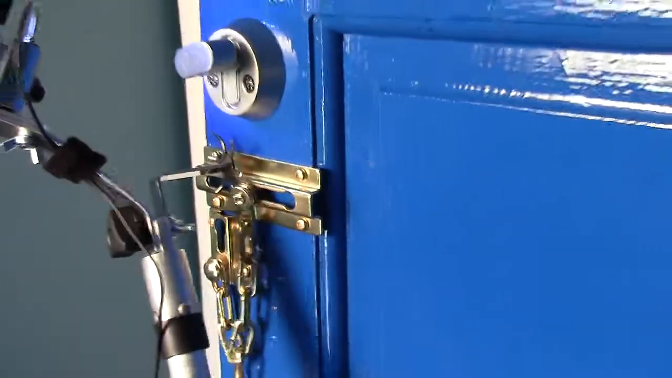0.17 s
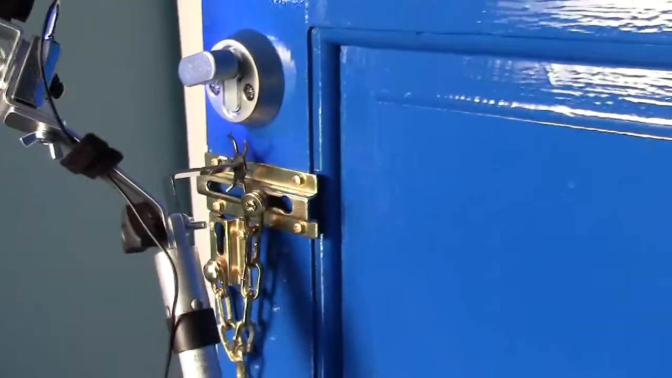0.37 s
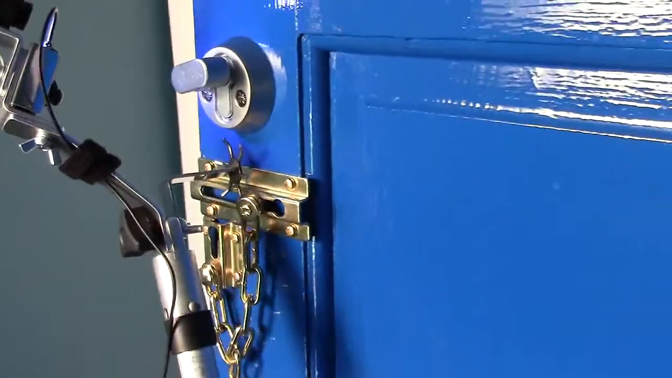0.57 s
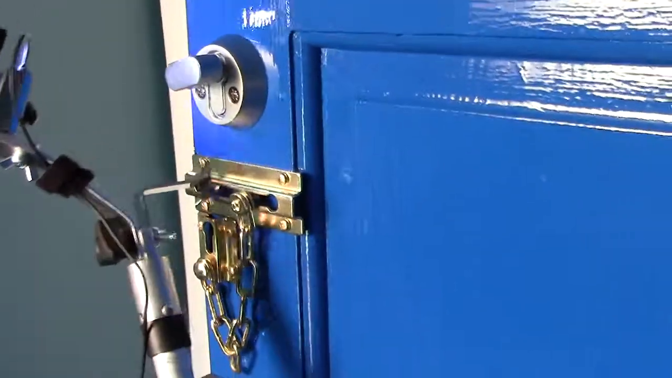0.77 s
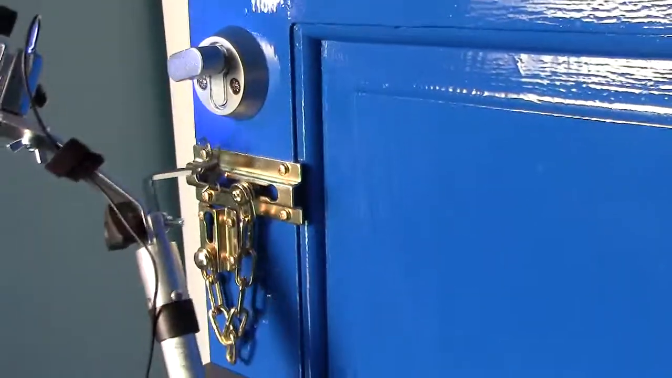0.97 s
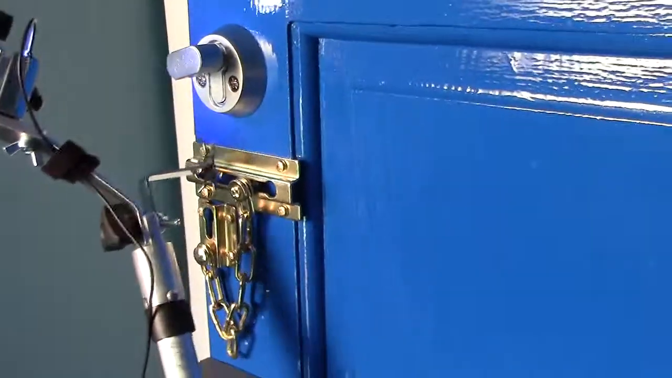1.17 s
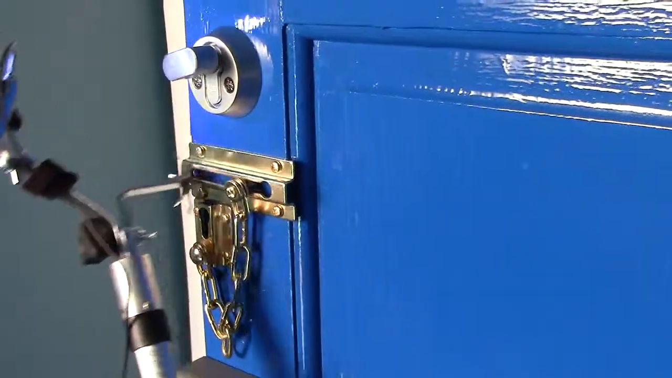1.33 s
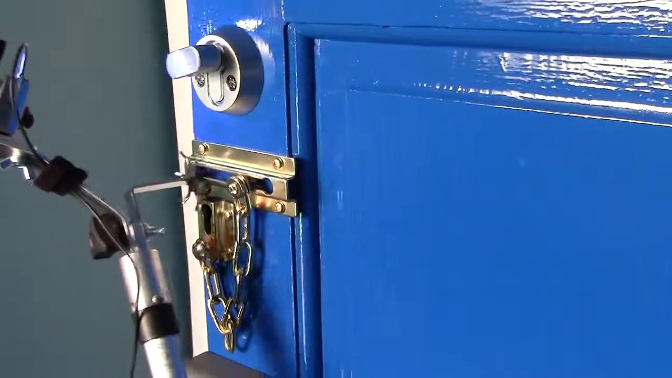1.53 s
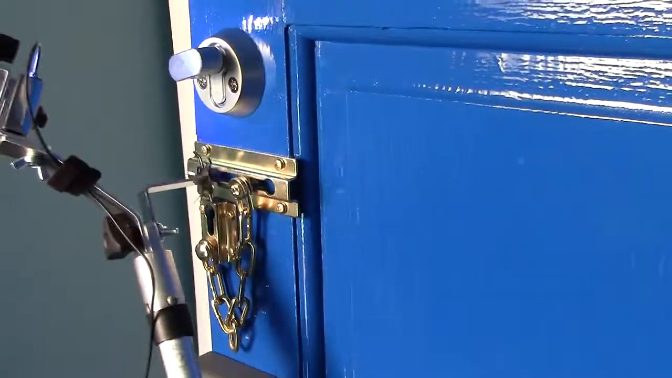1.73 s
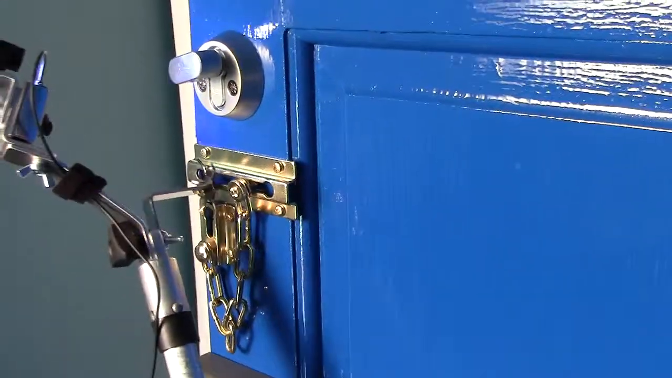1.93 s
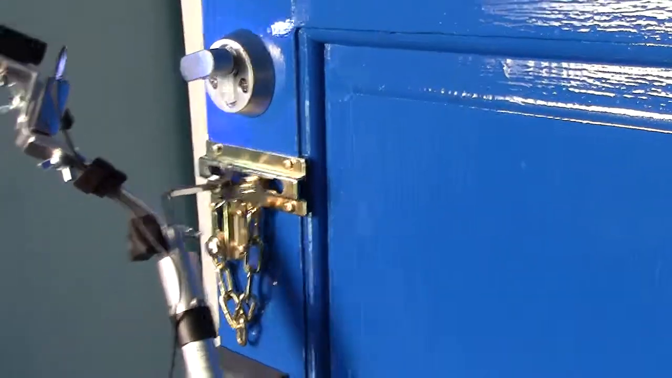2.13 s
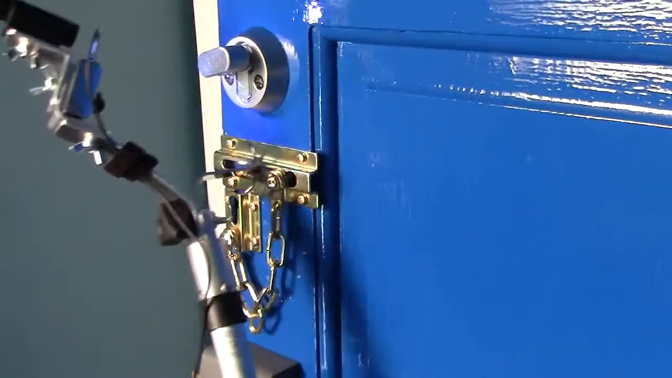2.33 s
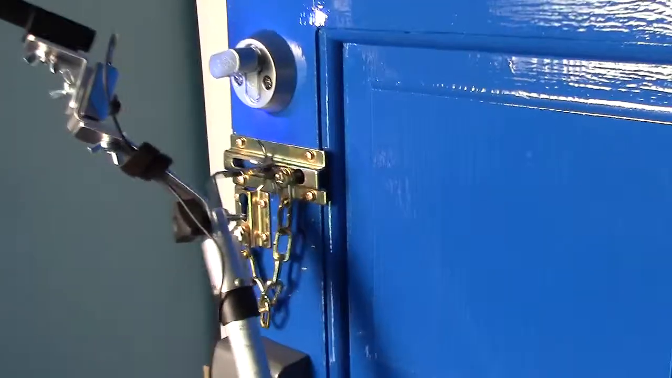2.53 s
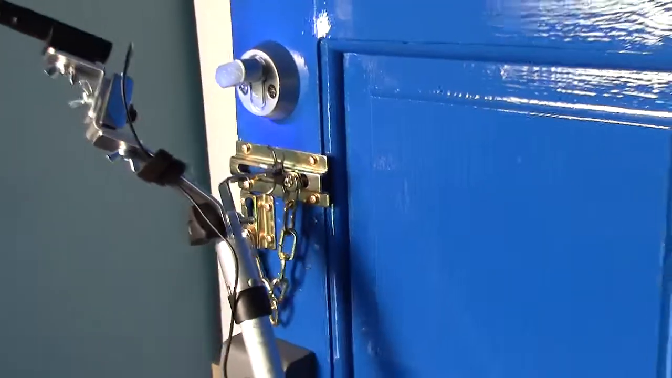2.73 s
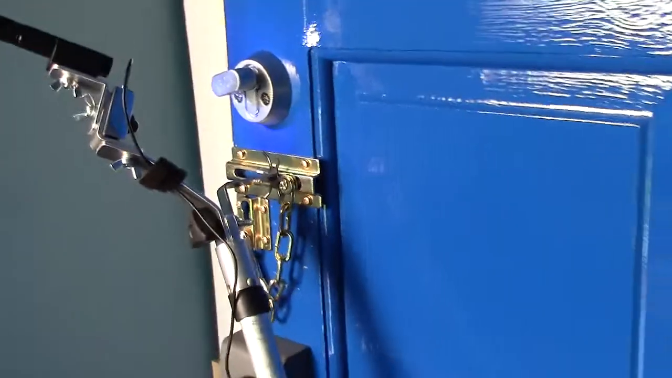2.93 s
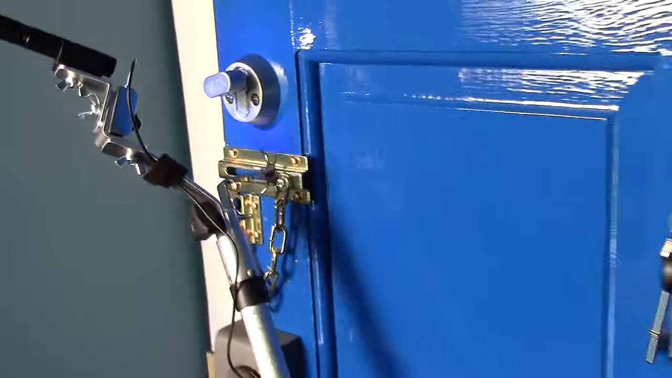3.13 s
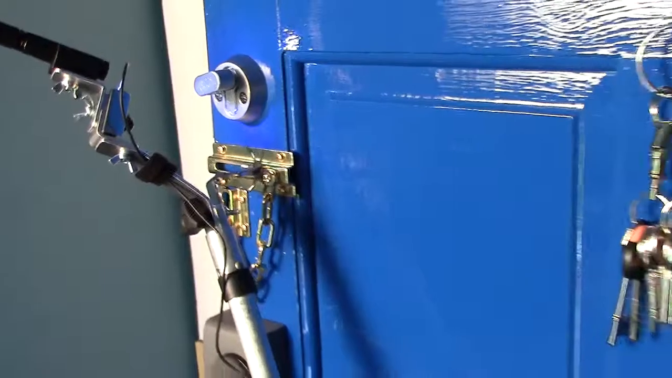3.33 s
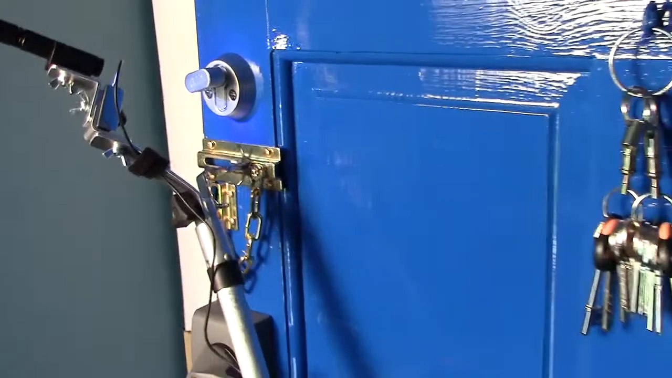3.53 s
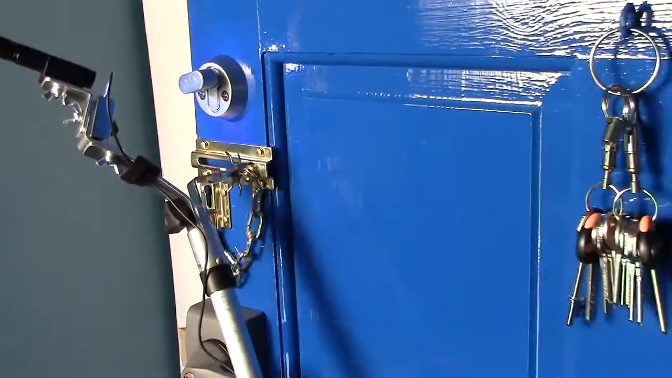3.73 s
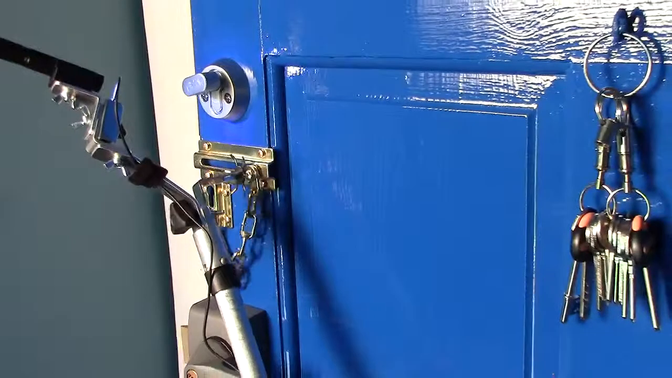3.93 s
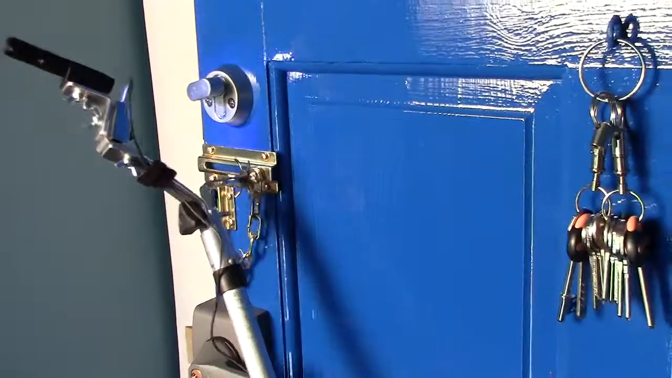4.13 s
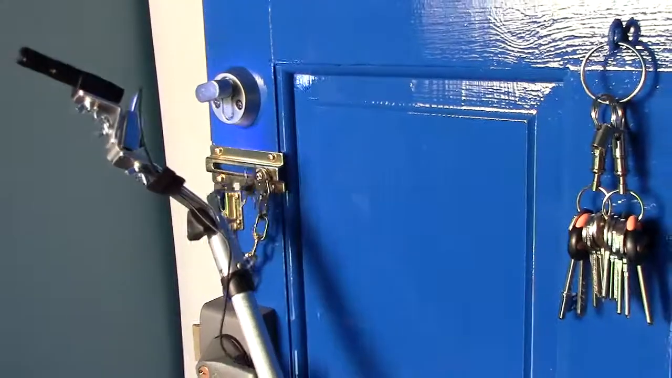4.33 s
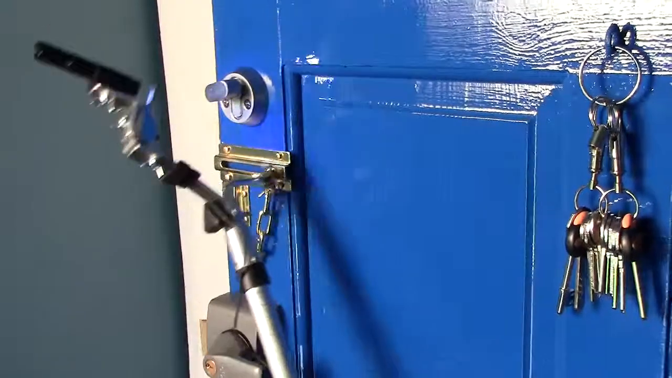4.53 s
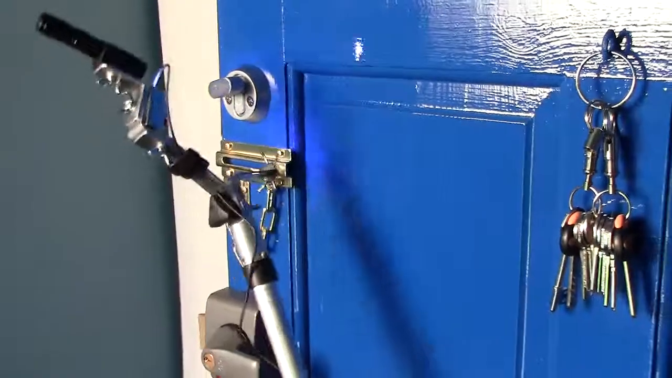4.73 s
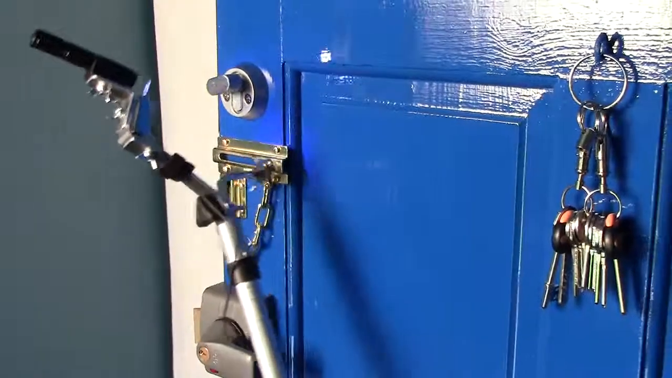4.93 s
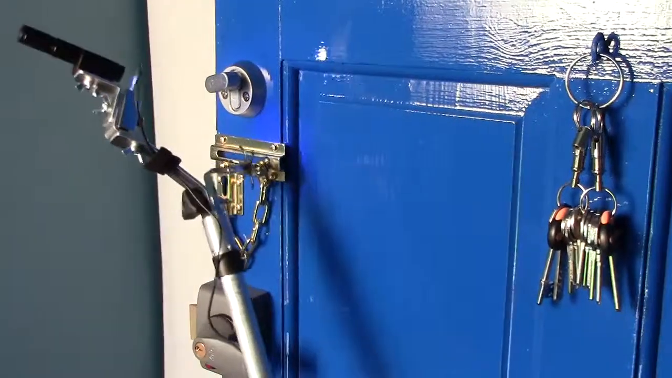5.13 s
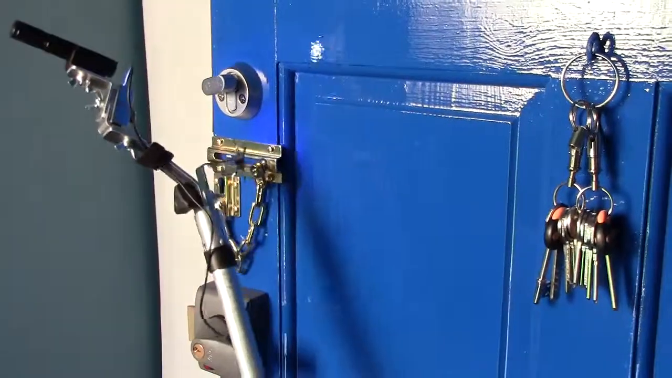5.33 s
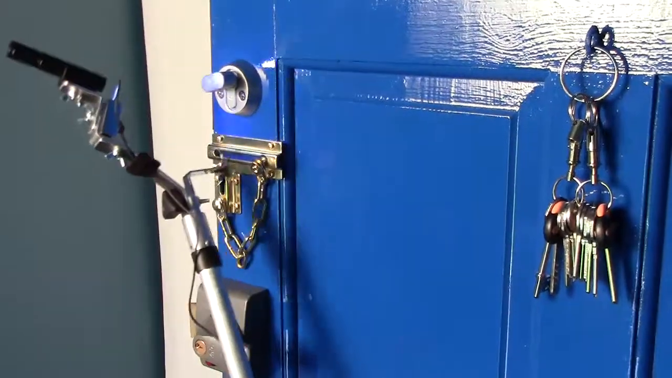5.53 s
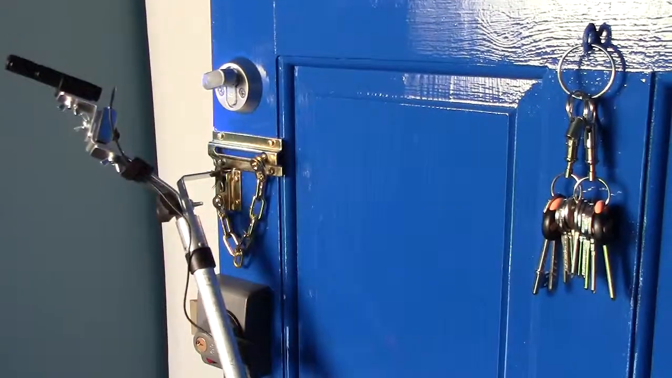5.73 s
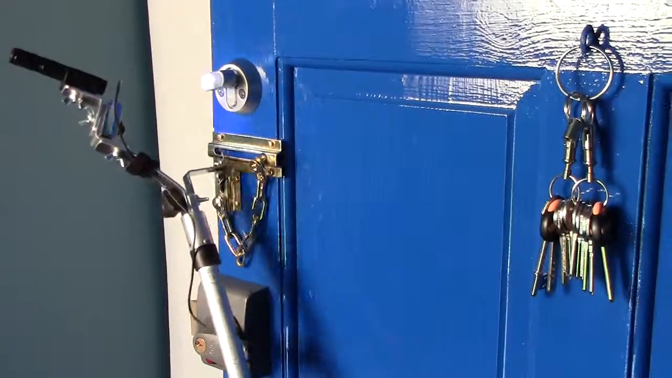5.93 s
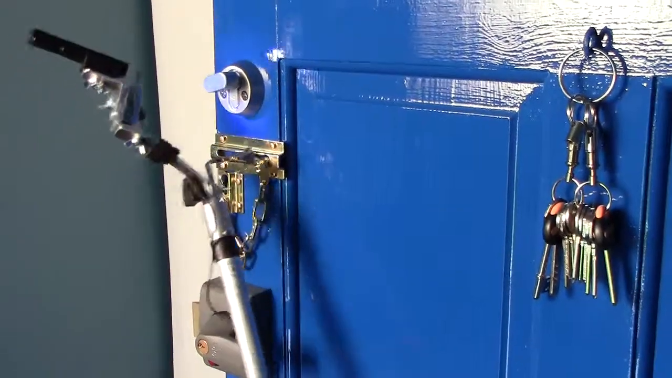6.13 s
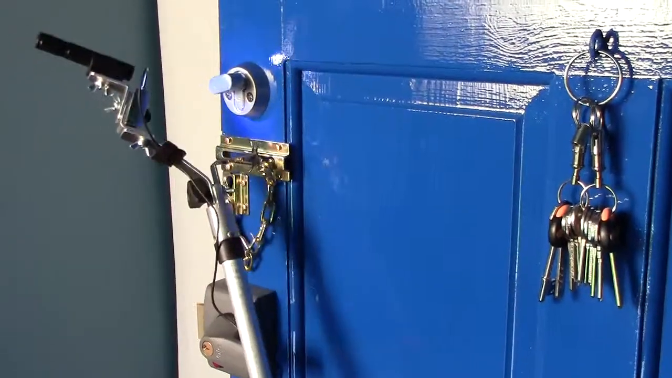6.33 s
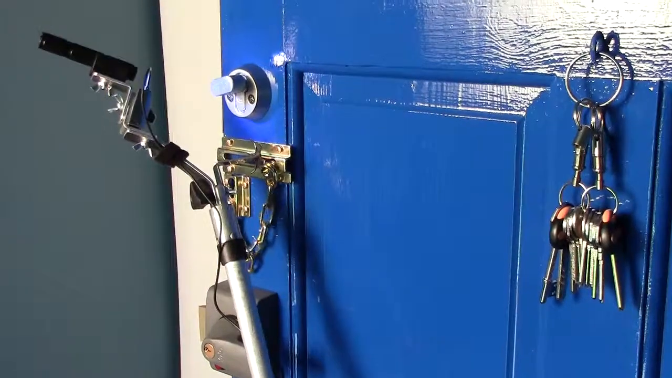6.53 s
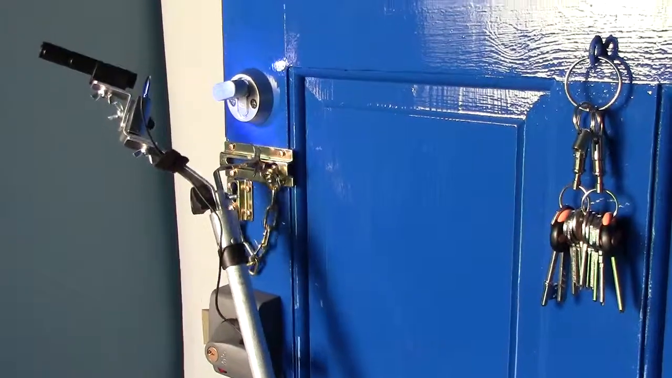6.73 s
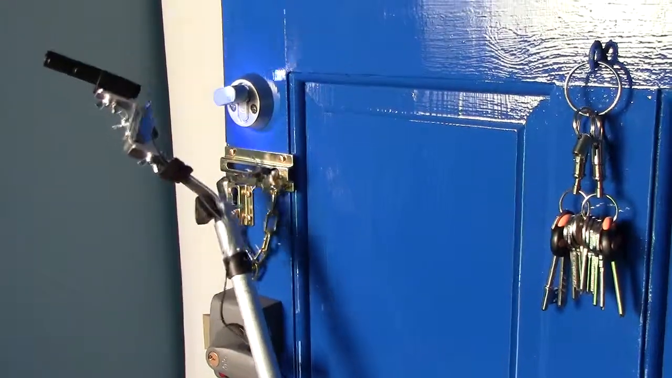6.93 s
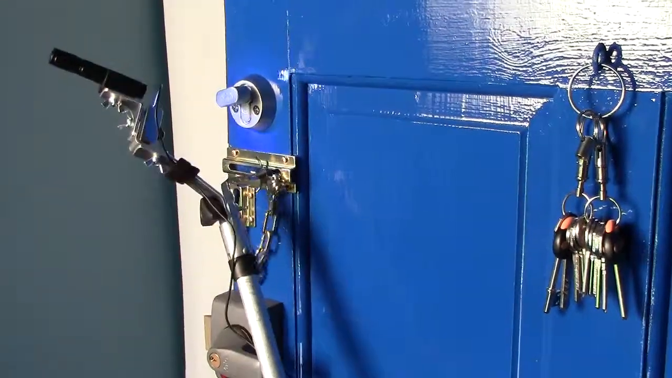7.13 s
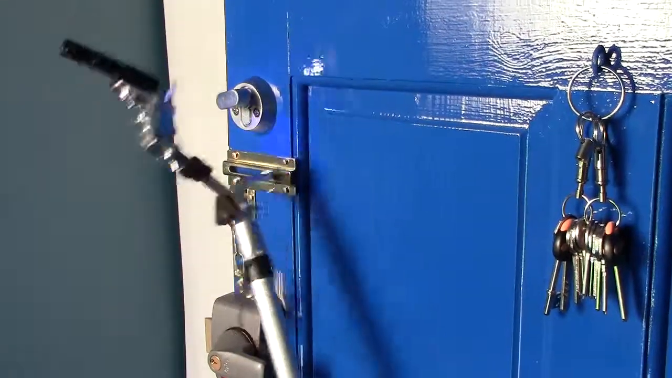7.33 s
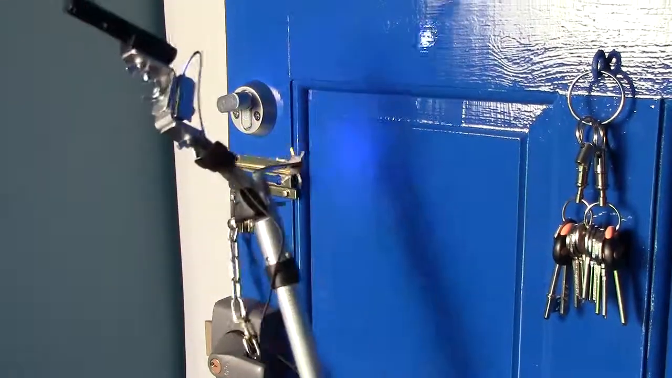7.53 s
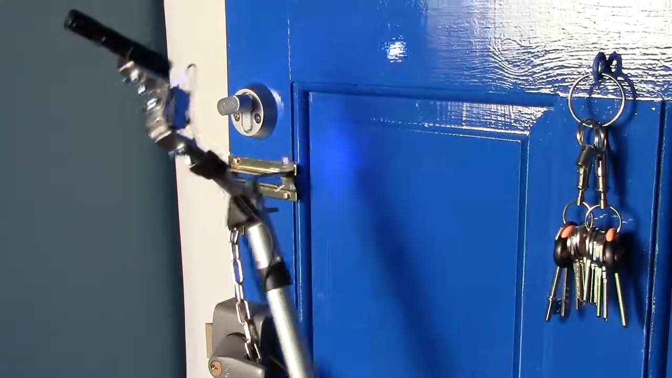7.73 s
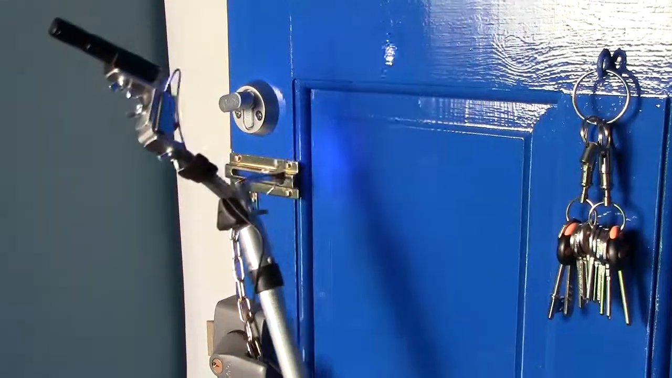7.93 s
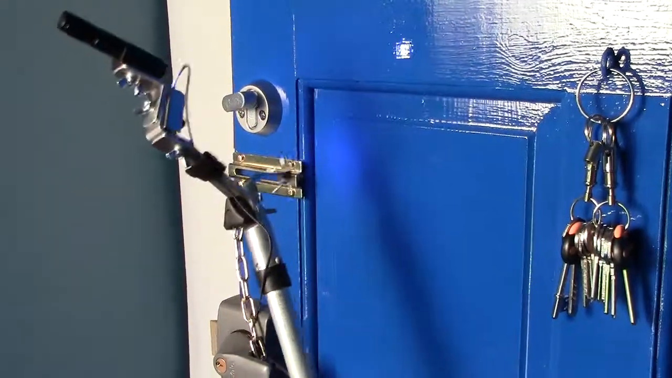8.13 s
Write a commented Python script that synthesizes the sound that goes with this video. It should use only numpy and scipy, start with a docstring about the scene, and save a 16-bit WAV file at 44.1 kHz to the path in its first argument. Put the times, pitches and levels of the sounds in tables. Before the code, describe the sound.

A metal rod taps and scrapes at a door chain, with dull door thuds and faint squeaks, until the chain falls clattering and jingling.

```python
"""In a small hallway, a hooked metal rod works a brass door chain out of its slide.
Knocks (sharp blows with chatter) and rough rattles (showers of clicks: scrapes and clatter after knocks)
shake a door, plate, rod and links, each a set of resonances. Decaying tones make the door boom and
single links ring; at last the chain drops and jingles. Thin gliding squeaks, noise, a hum and a low
drone hang over the quiet room, and decaying noise gives the hallway's reflections."""
import sys
import numpy as np
from scipy import signal
from scipy.io import wavfile

SR = 44100
rng = np.random.default_rng(int(sys.argv[2]) if len(sys.argv) > 2 else 0)


def master_out(mix):
    """Clip the mix to full scale and print it as 16-bit PCM to the path in sys.argv[1]."""
    frames = np.transpose(np.atleast_2d(mix))
    ceiling = np.clip(frames, -1, 1)
    pcm = np.round(ceiling * 32767).astype(np.int16)
    wavfile.write(sys.argv[1], SR, pcm)


N = 360738   # length in samples


def amp(db):
    """Turn decibels into gain."""
    return 10 ** (np.asarray(db) / 20)


def rms_one(x):
    """Scale a signal to rms 1."""
    return x / np.sqrt(np.mean(x ** 2) + 1e-20)


def at_hz(points, hz):
    """Read a table between its rows on a log-frequency axis."""
    table = np.array(points)
    return np.interp(np.log(hz), np.log(table[:, 0]), table[:, 1])


def span(rows):
    """Give a curve's sample positions, its columns at those positions and a gate that fades both ends."""
    s, *columns = np.transpose(rows)
    at = np.arange(int(s[0] * SR), min(int(s[-1] * SR), N))
    from_end = np.minimum(at - at[0], at[-1] - at)
    gate = np.clip(from_end / (0.0041 * SR), 0, 1)   # fades of 4.1 ms
    return at, [np.interp(at / SR, s, c) for c in columns], gate


def drift(rate_hz):
    """Smooth random movement with rms 1: noise through a two-pole low-pass at the given rate."""
    step = 40   # computed at every 40th sample, with straight lines between
    r = np.exp(-2 * np.pi * rate_hz * step / SR)
    noise = rng.standard_normal(N // step + 2002)
    slow = signal.lfilter([1], [1, -2 * r, r * r], noise)[2000:]
    return np.interp(np.arange(N) / step, np.arange(len(slow)), rms_one(slow))


def bands():
    """Half-octave band filters, each with its centre in Hz."""
    edges = 22 * 2 ** np.arange(0, 9.6, .5)
    return [(np.sqrt(low * high), signal.butter(2, [low, high], "band", fs=SR, output="sos"))
            for low, high in zip(edges, edges[1:])]


def add(out, s, sound):
    """Mix a short sound in at a time in seconds."""
    i = int(s * SR)
    out[i:i + len(sound)] += sound[:N - i]


# Colour of the steady noise. Each row: pitch in Hz, relative level in dB per Hz.
AIR_COLOUR = [(25, 1), (50, 2.5), (62, 5), (85, 4.5), (160, -2), (250, 0), (400, -3.5), (630, -6),
              (1000, -10), (2000, -15), (4000, -18), (8000, -23), (13000, -34), (16000, -12)]
# How alike the noise is on both sides. Each row: pitch in Hz, left-right likeness (1 is identical).
AIR_LIKENESS = [(60, 1), (180, 0.21), (550, 0.28), (1650, 0.61), (4970, 0.79), (15000, 0.7)]
# Tones of the hum. Each row: pitch in Hz, average level in dB rms.
HUM_TONES = [(150, -62), (230, -67), (460, -72), (690, -67.5), (916, -79)]
# The gliding low drone. Each row: time in seconds, pitch in Hz, peak level in dB.
DRONE_CURVE = [(0.0, 41.6, -49), (0.45, 41.1, -67), (1.07, 41.5, -46.5), (1.64, 41.0, -57),
               (4.19, 39.4, -48), (5.26, 40.7, -57), (6.17, 43.3, -65), (6.42, 46.3, -71),
               (6.54, 42.2, -60), (8.18, 36.9, -56.5)]
AIR_DB = -49.5   # rms of the noise


def room_air():
    """Steady stereo noise shaped band by band, plus a slightly wavering hum and a low drone."""
    noise, white = 0, rng.standard_normal((2, 2, N))
    for k, (hz, sos) in enumerate(bands()):
        mid, side = signal.sosfilt(sos, white[k % 2])
        alike = np.clip(at_hz(AIR_LIKENESS, hz), -1, 1)
        gain = amp(at_hz(AIR_COLOUR, hz) + 0.23 * drift(3))
        stereo = np.sqrt(1 + alike) * mid + np.sqrt(1 - alike) * side * [[1], [-1]]
        noise = noise + gain * stereo
    t = np.arange(N) / SR
    tones = np.zeros(N)
    for hz, db in HUM_TONES:
        level = amp(db + 3 + 2.0 * drift(7.9))   # 3 dB turns a sine's rms into its peak
        tones += level * np.sin(2 * np.pi * hz * t + 0.58 * drift(1.9))
    at, (hz, level_db), _ = span(DRONE_CURVE)
    tones[at] += amp(level_db) * np.sin(2 * np.pi * np.cumsum(hz) / SR)
    return amp(AIR_DB) * rms_one(noise) + tones


# How long reflections last. Each row: pitch in Hz, seconds to fall by 60 dB.
HALL_T60 = [(100, 0.45), (300, 0.43), (1000, 0.34), (4000, 0.23), (13000, 0.12)]
# How little the two sides differ. Each row: pitch in Hz, level of the difference against the middle in dB.
HALL_SIDE = [(100, -19), (1000, -26.5), (4000, -16), (13000, -13.5)]
HALL_DB = -0.5


def hallway(x):
    """Reflections as noise that dies band by band; left and right share most of the tail."""
    t = np.arange(int(.7 * SR)) / SR
    white = rng.standard_normal((2, 2, len(t)))
    tail = 0
    for k, (hz, sos) in enumerate(bands()):
        fall_db = -60 * t / at_hz(HALL_T60, hz)
        mid_side_db = [[0], [at_hz(HALL_SIDE, hz)]]
        tail = tail + signal.sosfilt(sos, white[k % 2]) * amp(fall_db + mid_side_db)
    tail = tail * np.clip(t / 0.0014, 0, 1)   # fades in over 1.4 ms
    tail = tail / np.sqrt(np.sum(tail[0] ** 2))
    mid, side = signal.fftconvolve(x[None], tail, axes=1)[:, :N]
    return amp(HALL_DB) * (mid + side * [[1], [-1]])


# Thin squeaks. Each row: start in seconds, length in seconds, first pitch in Hz, last pitch in Hz,
# level in dB rms before the swell and the mix, pitch blur in Hz.
SQUEAK_GLIDES = [(.42, .08, 7500, 6700, -72, 100), (.6, 0.11, 7700, 7100, -76, 91),
                 (0.812, 0.12, 5750, 5700, -71, 60), (1.09, 0.1, 4070, 4030, -64.5, 40),
                 (1.244, 0.12, 6000, 5950, -68, 200), (1.406, 0.12, 4050, 4070, -62, 40),
                 (2.33, 0.16, 4320, 4320, -68, 120), (2.55, 0.18, 4500, 4460, -63, 200),
                 (2.75, 0.17, 4800, 4720, -65, 100), (2.617, 0.107, 6050, 5860, -69, 150),
                 (3.325, .3, 6420, 6500, -62.5, 120), (3.6, .22, 6250, 6100, -73, 80),
                 (3.47, 0.45, 5500, 5300, -63, 148), (3.62, 0.28, 5070, 5130, -68, 150),
                 (8.0, 0.1, 3800, 3780, -70, 50)]
SQUEAK_SWELL = 0.26   # power of the sine-shaped swell; lower is flatter


def squeaks():
    """Thin gliding tones: the pitch wanders quickly and the level flutters."""
    out, wobble, flutter = np.zeros(N), drift(107), rms_one(1.6 + drift(60))
    for s, length_s, first_hz, last_hz, level_db, blur_hz in SQUEAK_GLIDES:
        at = np.arange(int(s * SR), min(int((s + length_s) * SR), N))
        along = np.linspace(0, 1, len(at))
        hz = first_hz + (last_hz - first_hz) * along + blur_hz * wobble[at]
        swell = np.sin(np.pi * along).clip(0) ** SQUEAK_SWELL
        tone = np.sqrt(2) * np.sin(2 * np.pi * np.cumsum(hz) / SR)
        out[at] += swell * amp(level_db) * flutter[at] * tone
    return out


WANDER_HZ = 45.7                     # loose contact blurs every ringing pitch by this width
PAIR_SPLIT, PAIR_DB = 0.0516, -3.5   # a weaker second tone sits this share higher, and the two beat


def rings(rows):
    """Decaying tone pairs (s, dB, Hz, t60 s, rise s); loose contact makes the pitch wander at random."""
    out, t = np.zeros(N), np.arange(SR // 2) / SR
    for s, db, hz, t60, rise_s in rows:
        wander = np.cumsum(rng.standard_normal(len(t))) * np.sqrt(WANDER_HZ * 2 * np.pi / SR)
        turn = 2 * np.pi * hz * t + wander
        second = np.sin(turn * (1 + PAIR_SPLIT) + rng.uniform(0, 2 * np.pi))
        pair = np.sin(turn) + amp(PAIR_DB) * second
        rise = 1 - np.exp(-t / rise_s)
        add(out, s, amp(db - 60 * t / t60) * rise * pair)
    return out


# Pushes and jolts that set the door panel ringing.
# Each row: start in seconds, level in dB before the rise and the mix, pitch in Hz.
DOOR_THUDS = [(0.151, -37.5, 283), (0.708, -32, 75), (0.719, -33, 249), (.792, -23.5, 455),
              (0.798, -35, 97), (1.598, -23.5, 426), (1.604, -26, 156.5), (1.603, -28, 233),
              (1.734, -25.5, 460), (1.738, -35, 91.6), (2.092, -33, 450), (2.453, -37.5, 406),
              (2.705, -36.5, 151), (3.089, -33, 90), (3.093, -31, 291), (3.176, -29.5, 302),
              (3.216, -29.5, 155), (3.219, -18.5, 571), (3.881, -38, 132), (3.891, -22.5, 305),
              (4.18, -30.5, 297), (4.198, -39, 110), (4.205, -20, 428), (4.326, -35, 364),
              (5.046, -24, 654), (5.301, -21, 284), (5.309, -38, 85), (5.892, -36, 97), (6.22, -32.5, 448),
              (6.249, -38, 107), (6.918, -29, 94), (6.918, -23, 423), (7.025, -28.5, 97), (7.056, -31, 656),
              (7.399, -54, 69.5), (7.43, -16.5, 463), (7.58, -49, 111), (7.581, -29, 246)]
THUD_T60_S, THUD_DAMPED_HZ = 0.18, 313   # longest ring, for low thuds; halved at this pitch
THUD_RISE_CYCLES = 0.86


def thuds():
    """The door panel starts softly, and the higher it rings the sooner it dies."""
    rows = []
    for s, db, hz in DOOR_THUDS:
        t60 = THUD_T60_S / (1 + (hz / THUD_DAMPED_HZ) ** 2.6)
        rows.append((s, db, hz, t60, THUD_RISE_CYCLES / hz))
    return rings(rows)


# One link or the rod left ringing. Each row: start in seconds, level in dB before the rise and the mix,
# pitch in Hz, seconds to fall by 60 dB.
LINK_CLINKS = [(.72, -61, 9230, 0.36), (.79, -74, 5730, 0.33), (.848, -24.5, 832, 0.047),
               (0.849, -30.5, 2630, 0.019), (1.603, -33, 1227, 0.17), (2.231, -18, 5170, 0.027),
               (4.355, -18, 1185, 0.054), (4.467, -32, 5130, .06), (5.886, -24.5, 1790, 0.034),
               (5.886, -36.5, 1412, 0.095), (5.885, -27.5, 3290, 0.018), (6.82, -43.5, 579, .2),
               (6.917, -19.5, 1950, 0.013), (6.252, -21.5, 2995, 0.044), (7.03, -28.5, 1170, 0.31)]


def clinks():
    """Struck metal speaks almost at once, with a rise of 0.18 ms, then dies away."""
    return rings([(*clink, .00018) for clink in LINK_CLINKS])


def body(force, modes):
    """Resonances in parallel, scaled so that white force of rms 1 gives rms 1."""
    click = np.eye(1, SR // 4)[0]
    out, test = 0, 0
    for k, (hz, width, db) in enumerate(modes):
        r = np.exp(-np.pi * width / SR)
        b = amp(db) * (-1) ** k * (1 - r * r) * np.array([1, 0, -1])   # signs alternate
        a = [1, -2 * r * np.cos(2 * np.pi * hz / SR), r * r]
        out = out + signal.lfilter(b, a, force + 1e-18)
        test = test + signal.lfilter(b, a, click)
    return out / np.sqrt(np.sum(test ** 2))


def grains(per_s):
    """Random clicks of uneven size that come in clumps, scaled to rms 1."""
    born = rng.random(N) < per_s * amp(3 * drift(25)) / SR
    size = amp(3.9 * np.minimum(rng.exponential(1, N), 5))
    return rms_one(born * size * rng.choice([-1, 1], N))


# The free end of the chain jingling as it drops. Each row: time in seconds, level in dB before the mix.
JINGLE_CURVE = [(7.41, -50), (7.43, -35), (7.48, -42), (7.545, -35), (7.6, -34), (7.65, -55), (7.78, -66)]
# The ring of the chain end. Each row: pitch in Hz, width in Hz, relative level in dB.
CHAIN_END_MODES = [(12700, 400, 0)]


def jingle():
    """Loose links tap the chain end and keep its high note going; ringing twice keeps the note narrow."""
    at, (level_db,), gate = span(JINGLE_CURVE)
    once = body(grains(per_s=900.), CHAIN_END_MODES)
    note, out = body(once, CHAIN_END_MODES), np.zeros(N)
    out[at] = gate * amp(level_db) * rms_one(note[at])
    return out


# Rough rattle of door and metal: scrapes, and the short clatter that follows a knock.
# Each row: time of full force in seconds, swell in seconds, hold in seconds,
# then relative levels in dB for plate and rod together, the door, and the links.
ROUGH_RATTLES = [(0.156, .03, 0.18, -74, -56, -80), (0.396, .12, .01, -48, -43, -55),
                 (0.803, .1, .01, -60, -61, -59), (1.608, .005, 0.017, -53, -36, -66),
                 (1.742, .005, 0.02, -66, -39.5, -74), (2.122, .08, 0.024, -78, -45, -78),
                 (2.28, 0.013, 0.011, -33.5, -31, -51), (3.18, .01, .02, -34, -32, -60),
                 (3.854, 0.077, 0.046, -36.5, -34.5, -66), (4.199, 0.044, 0.0081, -28.5, -53, -53),
                 (4.389, 0.093, 0.033, -29, -49, -46), (4.564, 0.0093, 0.062, -29.5, -49, -37),
                 (5.297, .005, .03, -55, -44, -76), (6.248, .02, .02, -30.5, -46, -37),
                 (6.684, 0.022, .01, -60, -36, -67), (6.929, .005, 0.023, -47, -29.5, -64),
                 (7.052, 0.088, 0.0088, -21.5, -26, -31), (7.197, 0.012, .01, -33.5, -40, -43),
                 (7.41, .015, 0.19, -25, -29, -28), (7.73, .05, 0.2, -48.5, -56, -55.5)]
RATTLE_SWELL_DB, RATTLE_FALL_DB_PER_S = 29, 196   # gained during the swell; lost after the hold


def rattling():
    """Rough grains of force on door, plate, rod and links, each shower with a swell, a hold and a fade."""
    level, t = np.zeros((4, N)), np.arange(N) / SR
    for s, swell_s, hold_s, metal_db, door_db, links_db in ROUGH_RATTLES:
        at = slice(max(int((s - .2) * SR), 0), int((s + hold_s + .4) * SR))
        swell_db = RATTLE_SWELL_DB * (t[at] - s) / max(swell_s, 1 / 500)
        fall_db = RATTLE_FALL_DB_PER_S * (s + hold_s - t[at])
        shape_db = np.minimum(0, np.minimum(swell_db, fall_db))
        parts_db = np.array([[door_db - 11], [metal_db - 13.5], [metal_db - 16.0], [links_db - 11]])
        level[:, at] += amp(shape_db + parts_db)
    return level * grains(per_s=1300.)


# Hook or chain on the plate. Each row: start in seconds, strength in dB, share of the plate in dB,
# share of the links in dB, share sent round the hallway in dB.
PLATE_KNOCKS = [(0.0516, -48, 0.5, -25, -1), (0.1423, -48.5, 2, -28, 2), (0.1707, -48, 2, -31, -5),
                (0.2017, -37.5, 1, -32, -6), (0.2363, -28.5, -10, -37, -6), (0.263, -45, -4, -32, 8),
                (0.307, -29.5, -8.5, -33, 1), (0.34, -33.5, -3.5, -33, 1), (0.3623, -31, -3, -34, -3),
                (0.37, -25, -13.5, -38, -2), (0.3849, -30.5, -4, -37, -2), (0.3954, -25, -12, -34, -9),
                (0.4052, -33, -6.5, -26, 0.5), (0.4507, -36, 0, -27, 1.5), (0.7018, -41.5, -4, -16, 1),
                (0.717, -39.5, -5, -13, -2), (0.7916, -41.5, 4.5, -8, 0.5), (0.8455, -29, -19, -12.5, -12),
                (1.5506, -38, -2, -20, -21), (1.6008, -25, -5.5, -12.5, -3), (1.6125, -34, 1, -34, -17),
                (1.7362, -44.5, 4.5, -31, -1), (2.091, -53, 0.5, -22, 7), (2.2038, -27.5, -4.5, -21, 1),
                (2.2308, -6.5, -14.5, -20, -3.5), (2.3928, -46.5, 1.5, -30, 10.5),
                (2.4506, -13, -15, -18, -4), (2.5451, -25.5, -16, -17, -3), (2.707, -21.5, -8, -22, 0),
                (2.8722, -32.5, -12, -16, 0), (2.9242, -16, -11, -15, -2.5), (3.044, -27, -8.5, -35, -1.5),
                (3.0964, -5.5, -20, -18, -3), (3.1723, -10.5, -15.5, -21.5, 0),
                (3.1854, -19, -12, -38, 0.5), (3.3168, -29, -12, -32, -2.5), (3.571, -25.5, -18, -29, -4.5),
                (3.7301, -28.5, -6.5, -39, -1.5), (3.8098, -19, -15.5, -16.5, 0),
                (3.8452, -26, -13, -30, -1), (3.8871, -21.5, -13, -26, 3.5), (3.9003, -23, -7, -22, -4),
                (3.9318, -22.5, -14, -26, -2), (4.1768, -36, -4.5, -26, 4),
                (4.2043, -13.5, -15.5, -34, -11), (4.353, -3, -16, -11.5, -2),
                (4.4357, -19.5, -22, -32, -2), (4.4681, -25, -8.5, -7, -0.5), (4.5137, -23, -6, -19, 2.5),
                (4.548, -3.5, -17.5, -12, -2.5), (4.559, -15, -10, -17, -1.5), (4.628, -11, -18, -28, -1.5),
                (4.6416, -18, -13, -23, -9), (4.6685, -14, -12.5, -24, 0), (4.7062, -25.5, -18, -13, -2),
                (4.8329, -28, -9, -42, -4), (4.969, -42, -19, -28, -13), (5.0488, -28, -2, -42, -5.5),
                (5.8859, -32, -10, -8.5, 0), (6.2199, -12.5, -10, -7.5, 0), (6.2518, -9, -22, -17, 0.5),
                (6.269, -26, -23, 0, -10), (6.2845, -20, -11.5, -18, -0.5), (6.3614, -7, -13, -26, -2.5),
                (6.6779, -32.5, -3, -10, -0.5), (6.6895, -31.5, -5, -25, -9), (6.755, -41, 4.5, -31, 0),
                (6.9182, -17.5, -1.5, -17.5, -3.5), (7.0057, -25, -7, -22, 2), (7.0175, -13, -11, -15, 6),
                (7.0266, -6, -17.5, -9.5, -2), (7.0603, -5.5, -21, -20, -1), (7.0779, -18, -6, -10, -3),
                (7.1581, -10, -12.5, -12.5, -2), (7.224, -24.5, -31, -23, 1.5),
                (7.2407, -27.5, -7.5, -25, 1.5), (7.322, -35.5, -4.5, -26, 1), (7.3869, -24, -7, -2, 11.5),
                (7.3985, -8, -9, -3.5, -0.5), (7.428, -5, -11.5, -4.5, -1), (7.4479, -9.5, -10, -5, -2),
                (7.474, -15.5, -15, -14, 0), (7.4978, -11.5, -15, -15, -12), (7.5068, -12, -9.5, -8.5, 5.5),
                (7.5299, -15, -7, -22, -4), (7.5424, -18.5, -23, -9, 7), (7.5851, -9.5, -13.5, -7.5, 2.5),
                (7.7031, -31, -5.5, -25, -1.5), (7.7144, -34.5, -4.5, -21, 3.5), (7.7891, -42, -5, -8, 4),
                (7.8102, -34.5, -7, -13, -0.5), (7.8391, -29.5, -13, -26, -2.5),
                (7.9302, -44, -6, -15, -11), (8.1161, -27.5, -4, -13, -23)]
ROD_SHARE_DB = -9.5
DOOR_DB, DOOR_FOLLOWS = -30, 0.49   # door level under a 0 dB knock; dB it follows per dB of strength


def knocking():
    """Each knock is one sharp blow and a few milliseconds of chatter; direct and hallway-bound forces."""
    force, t = np.zeros((2, 4, N + SR)), np.arange(SR // 25) / SR
    t60 = np.array([[.03], [.015], [.01], [.008]])   # the contact lasts longer on the heavier parts
    contact = rng.standard_normal((len(PLATE_KNOCKS), 4, len(t))) * amp(-60 * t / t60 + 1)
    contact[:, :, 0] = amp([24.3, 13.5, 17.1, 11.0])   # the blow on door, plate, rod and links
    for (s, knock_db, plate_db, links_db, sent_db), burst in zip(PLATE_KNOCKS, contact):
        i = int(s * SR)
        door_db = DOOR_DB + DOOR_FOLLOWS * knock_db
        parts_db = [door_db, knock_db + plate_db, knock_db + ROD_SHARE_DB, knock_db + links_db]
        direct_and_sent = amp([[[0]], [[sent_db]]])
        force[:, :, i:i + len(t)] += direct_and_sent * amp(parts_db)[:, None] * burst
    return force[:, :, :N]


# Heavily damped resonances of the door panel, slide plate, rod and chain links.
# Each row: pitch in Hz, width in Hz, relative level in dB.
DOOR_MODES = [(90, 66, -2), (141, 21, -9.5), (235.5, 62, -3.5), (306, 29, 0.5), (376, 110, -1.5),
              (612, 58, 2.5), (930, 570, -3.5)]
PLATE_MODES = [(1130, 190, 6.4), (1510, 236, 3.8), (1776, 202, 4.5), (2346, 290, 0.075)]
ROD_MODES = [(2875, 570, -0.89), (3610, 530, 0.23), (4240, 800, -1.1), (5060, 750, 1), (5510, 1380, -3.9)]
LINK_MODES = [(6400, 2300, 1), (9450, 8400, -3), (12460, 2700, -5), (14400, 1400, -28.5)]
# Where each part's treble is cut. One column: cutoff in Hz, for door, plate, rod and links in turn.
PART_TOPS = [1300, 3500, 7000, 17000]


def metalwork():
    """Knocks and rattles shake the four resonant parts: direct sound and what feeds the hallway."""
    force = knocking() + rattling()
    out = 0
    for k, modes in enumerate([DOOR_MODES, PLATE_MODES, ROD_MODES, LINK_MODES]):
        top = signal.butter(3, min(PART_TOPS[k], .45 * SR), fs=SR, output="sos")
        out = out + signal.sosfilt(top, body(force[:, k], modes))
    return out


def scene():
    """Everything at the door, its reflections and the room's steady sound."""
    tones = thuds() + clinks() + jingle() + squeaks()
    direct, sent = metalwork() + tones * amp([[1.5], [-4]])
    balance = amp([[-.2], [.2]])   # left, right
    return (direct + hallway(sent)) * balance + room_air()


CUTOFF_HZ, OFFSET = 16800, 0.01


def record(dry):
    """Peaks are rounded, the top is cut and a small steady offset is added."""
    rounded = .9 * np.tanh(dry / .9)
    low_pass = signal.cheby2(12, 70, CUTOFF_HZ, fs=SR, output="sos")
    return signal.sosfilt(low_pass, rounded) + OFFSET


dry = scene()
out = record(dry)
master_out(out)
```